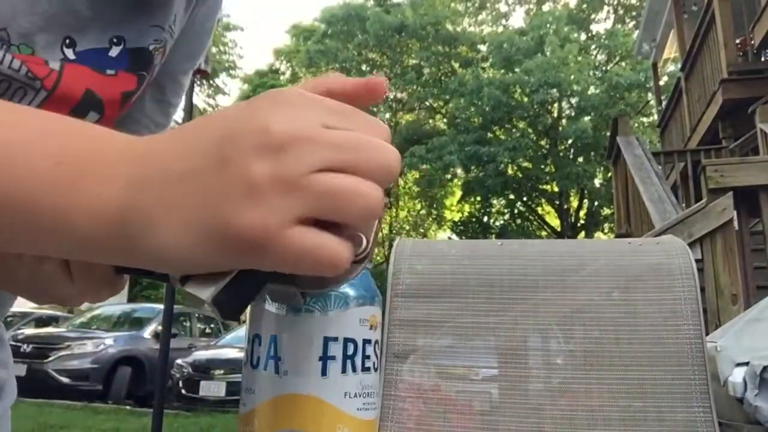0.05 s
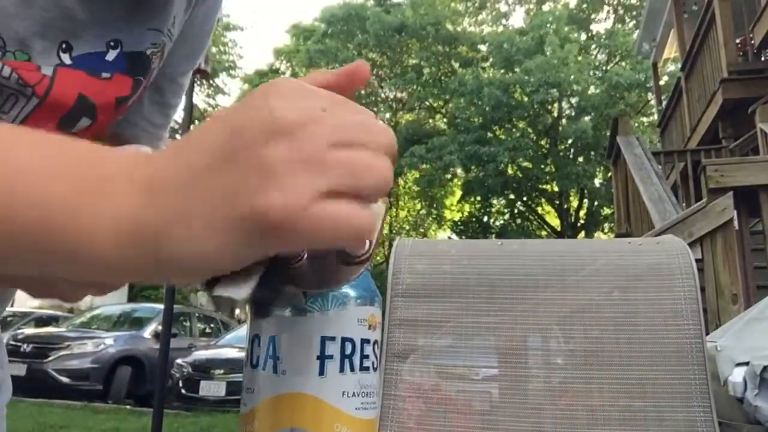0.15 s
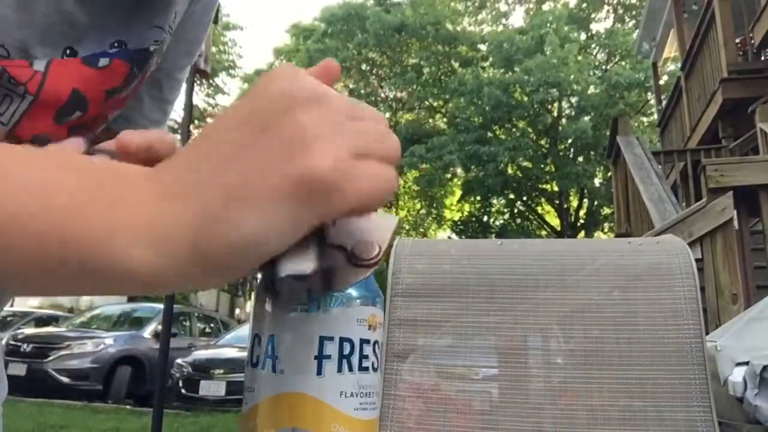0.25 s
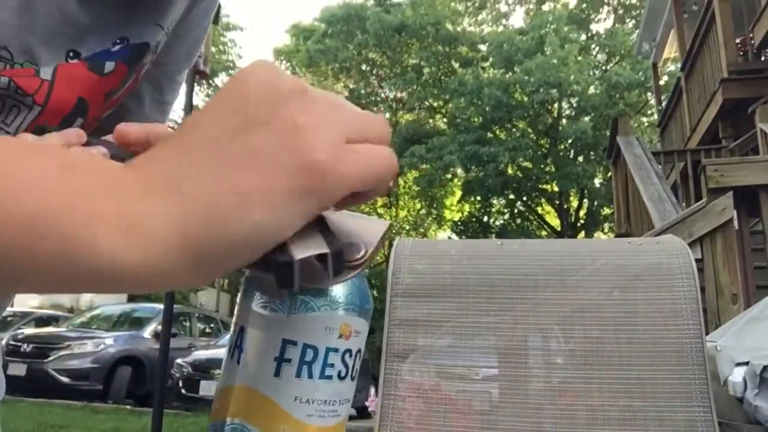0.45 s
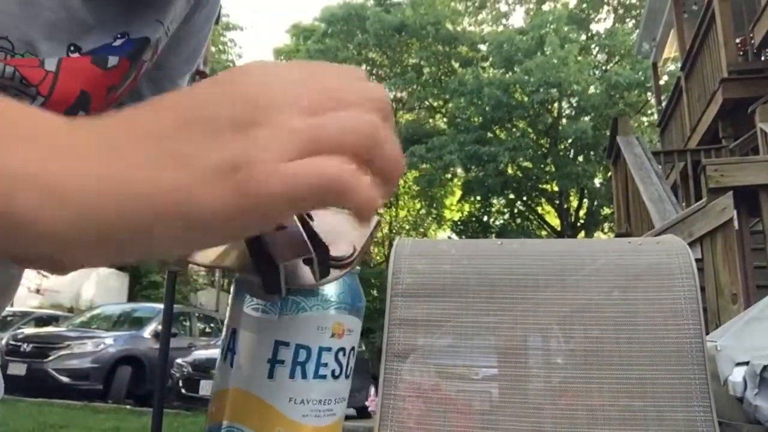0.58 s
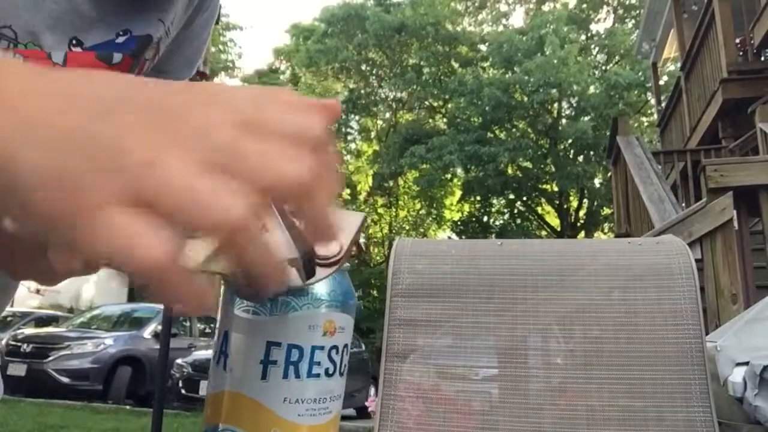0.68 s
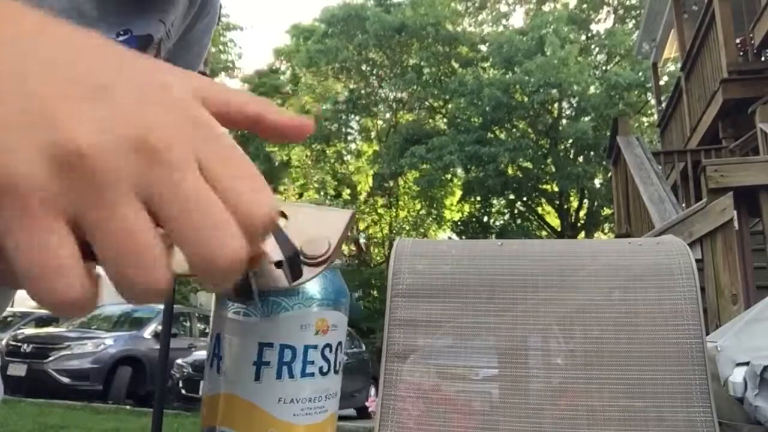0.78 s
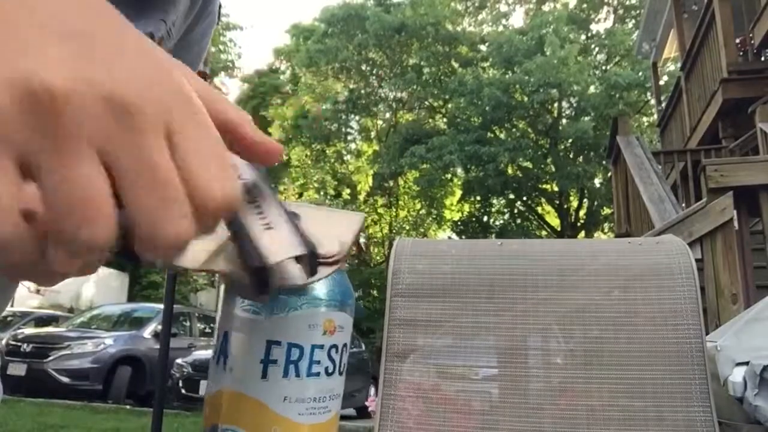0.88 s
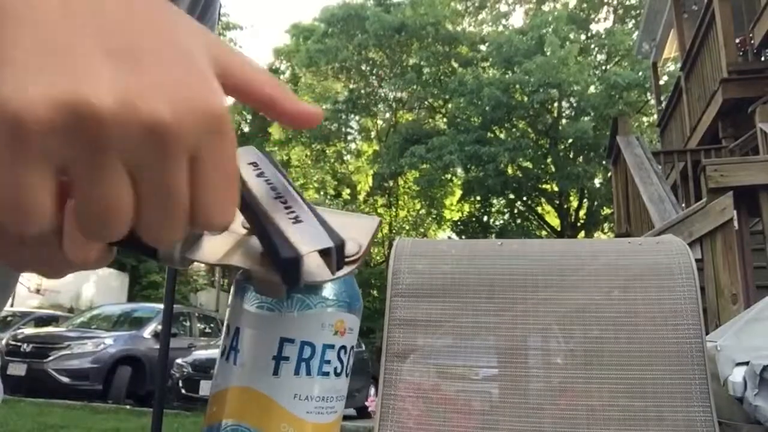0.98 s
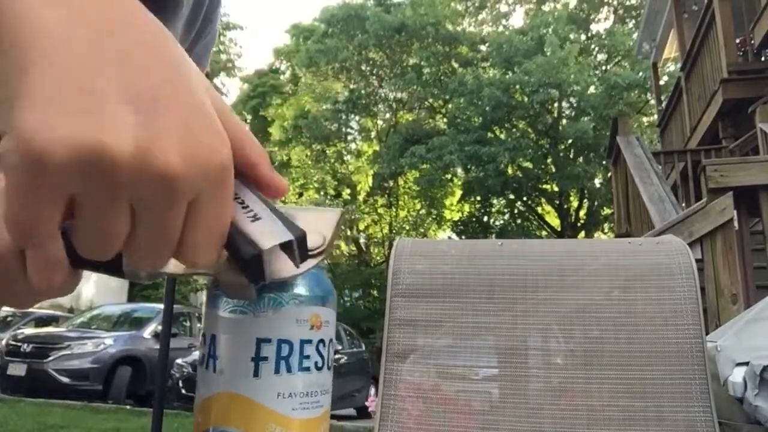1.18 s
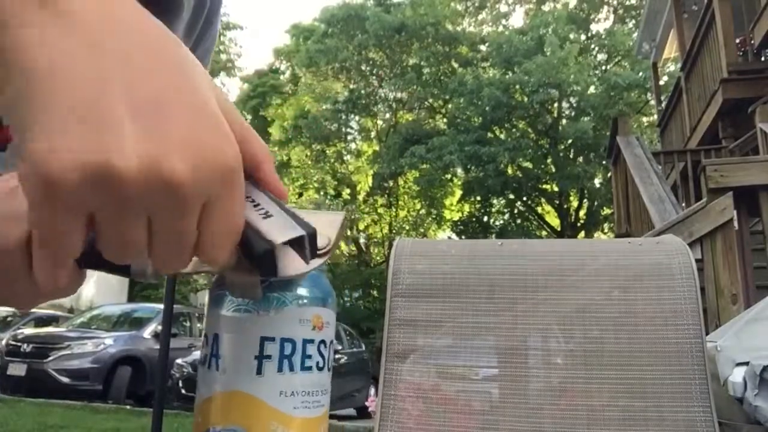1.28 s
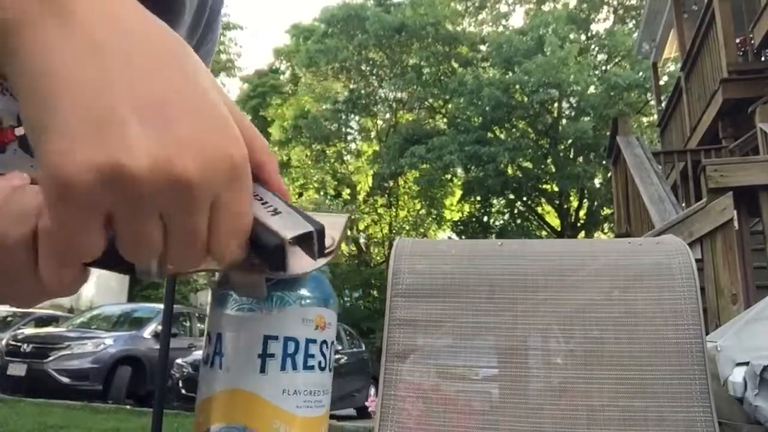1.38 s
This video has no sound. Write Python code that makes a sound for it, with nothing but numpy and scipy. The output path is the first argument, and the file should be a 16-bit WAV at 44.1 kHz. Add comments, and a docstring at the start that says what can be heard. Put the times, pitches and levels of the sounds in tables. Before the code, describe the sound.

A drink can is punctured close by with a sharp metallic pop at about 0.3 seconds, amid low table thumps from 0.2 to 0.4 seconds. Gas escapes in a short hiss, gone by about 0.5 seconds, leaving a faint, fading fizz. The opener ticks lightly near 0.6, 0.9 and 1.4 seconds. Distant traffic and a low, wavering drone fill the quiet yard throughout.

```python
"""Distant traffic and a low drone fill a quiet yard, while an opener rubs faintly on a drink can.
Pressing it into the pressurised can makes the table underneath thump. The lid gives way with
a sharp metallic pop, and the gas escapes in a short hiss. Tiny bubbles then fizz softly
in the drink, and the opener ticks a few more times as it shifts."""
import sys
import numpy as np
from scipy import signal
from scipy.fft import rfft, irfft
from scipy.io import wavfile

SR = 44100
rng = np.random.default_rng(int(sys.argv[2]) if len(sys.argv) > 2 else 0)


def unload_audio(sound):
    """Save the sound as a 16-bit wav file, at the path given as the first command line argument."""
    columns = np.transpose(np.atleast_2d(sound))
    # keep every value between -1 and 1, then stretch to whole-number steps
    steps = np.round(np.clip(columns, -1, 1) * 32767)
    wavfile.write(sys.argv[1], SR, steps.astype(np.int16))


N = 63945
POP_S = 0.3115  # the moment the lid gives way


def amp(db):
    """Turns decibels into a number to multiply by."""
    return 10 ** (np.asarray(db) / 20)


def unit(x):
    """Scales a signal so that its average strength (rms) is 1."""
    return x / np.sqrt(np.mean(x ** 2) + 1e-20)


def since(start):
    """Seconds since start, zero before it."""
    return np.maximum(np.arange(N) / SR - start, 0)


def colour(x, spectrum):
    """Makes some pitches of x stronger than others, then scales it to strength 1."""
    hz, db = np.transpose(spectrum)
    log_hz = np.log(np.fft.rfftfreq(N, 1 / SR) + 1)
    gain = amp(np.interp(log_hz, np.log(hz + 1), db))
    return unit(irfft(rfft(x) * gain, N))


def noise(spectrum):
    """A steady rushing sound with the given mix of low and high pitches."""
    return colour(rng.standard_normal(N), spectrum)


def drift(rate):
    """A smooth random wobble, up to about rate times a second."""
    hz = np.fft.rfftfreq(N, 1 / SR)
    keep_slow = np.exp(-(hz / rate) ** 2) * (hz > 0)
    return unit(irfft(rfft(rng.standard_normal(N)) * keep_slow, N))


def burst(start, rise, hold, fade):
    """A quick swell that begins to die hold seconds after start, losing 60 dB in fade seconds."""
    t = since(start)
    return np.minimum(t / rise, 1) * np.exp(-np.log(1000) * np.maximum(t - hold, 0) / fade)


def ring(start, hz, db, fade, rise):
    """One dying tone of something that has been struck."""
    return amp(db) * burst(start, rise, 0, fade) * np.sin(2 * np.pi * hz * since(start))


# Low and high pitches in the traffic: f/Hz, relative level/dB
TRAFFIC_SPECTRUM = [(25, -43), (36, -35), (48, -21), (66, -6), (82, -13), (100, -12), (145, -14),
                    (175, -11), (228, -14), (262, -13), (300, -18), (382, -20.5), (461, -26.5), (750, -22),
                    (1060, -21), (1640, -26.5), (2300, -34), (3300, -40), (4570, -42), (8000, -51),
                    (15800, -62.5)]
def traffic():
    """Faraway vehicles blur into one steady wash."""
    return amp(-40.5) * noise(TRAFFIC_SPECTRUM)


# How the drone swells and dips: t/s, level/dB
DRONE_SWELLS = [(0, -36), (0.061, -52), (0.139, -35), (.176, -51), (.21, -40.5), (.42, -48), (.53, -44),
                (.57, -40.5), (.82, -34), (.884, -39), (.98, -36.5), (1.1, -41.5), (1.148, -49),
                (1.226, -37), (1.276, -48), (1.345, -33.5), (1.38, -40), (1.45, -36)]
# Pitches in the rumble around the drone: f/Hz, relative level/dB
RUMBLE_SPECTRUM = [(50, -22), (95, -2), (135, -1.5), (200, -9), (300, -18), (600, -55)]
def drone():
    """A low, wavering tone and a softer rumble swell and flutter together."""
    pitch_hz = 64.87 + 3.26 * drift(rate=14)
    cycles = np.cumsum(pitch_hz) / SR
    tone = unit(np.sin(2 * np.pi * cycles))
    swell = amp(np.interp(since(0), *np.transpose(DRONE_SWELLS)))
    flutter = 1 + 0.16 * drift(rate=45)
    rumble = amp(-9.5) * noise(RUMBLE_SPECTRUM)
    return swell * flutter * (tone + rumble)


# Ticks and scrapes of the opener: t/s, level/dB, fade time/s
OPENER_TICKS = [(.1014, -70, .04), (.1894, -69, .03), (0.6193, -50.5, 0.11), (0.858, -41, .02),
                (1.3844, -59, .03)]
# Pitches in the sound of the blade on the lid: f/Hz, relative level/dB
SCRAPE_SPECTRUM = [(500, -28), (2500, -12), (3850, -0.5), (5200, -4.5), (6800, -7), (10000, -15),
                   (16000, -21)]
def opener():
    """The blade rubs on the lid until it breaks through, and the tool ticks as it shifts."""
    rub = amp(-58) * (since(POP_S) == 0)
    ticks = sum(amp(db) * burst(start, rise=0.0011, hold=0, fade=fade) for start, db, fade in OPENER_TICKS)
    return (rub + ticks) * noise(SCRAPE_SPECTRUM)


# Jolts that the can passes to the table: t/s, level/dB, centre f/Hz
JOLTS = [(.197, -10.5, 260), (0.251, -15, 290), (0.3019, 0.5, 346), (.313, -3.5, 180), (0.371, -11.5, 136),
         (0.4209, -21.5, 260)]
# Tones of the table with the can on it: f/Hz, relative level/dB, fade time/s
TABLE_TONES = [(108.5, -17.5, 0.39), (141, -19, 0.065), (177.5, -10.5, 0.18), (222, -16, 0.38),
               (267, -28, 0.48), (308.6, -20.5, 0.38), (345, -37, 0.52)]
def table():
    """Each jolt sets the table booming, most of all in the tones near the jolt's own pitch."""
    width_octaves = 0.79  # the range of pitches that a jolt shakes strongly
    thumps = np.zeros(N)
    for start, jolt_db, centre_hz in JOLTS:
        for hz, tone_db, fade in TABLE_TONES:
            pitch_gap = np.log2(hz / centre_hz) / (width_octaves / 2)
            thumps += ring(start, hz, jolt_db + tone_db, fade, rise=0.015) / np.sqrt(1 + pitch_gap ** 2)
    return thumps


# Ringing tones of the lid and blade: f/Hz, level/dB, fade time/s
LID_TONES = [(716, -23, 0.04), (907, -29.5, 0.082), (1110, -32, 0.03), (1398, -27, 0.067),
             (1617, -23, 0.051), (1710, -31, 0.042), (2027, -33, 0.1), (2286, -16.5, 0.031),
             (2442, -19, 0.068), (2517, -31, 0.074), (3285, -14, 0.029), (3640, -23.5, 0.025),
             (4390, -10.5, 0.02), (4904, -10, 0.019), (5180, -28, .014), (5690, -14, 0.025),
             (8100, -13.5, 0.017), (8410, -10, 0.015), (9760, -14.5, 0.0091), (10760, -14, 0.01),
             (15250, -17, .014)]
# Pitches in the tearing metal: f/Hz, relative level/dB
TEAR_SPECTRUM = [(200, -14), (520, -23), (700, -3.5), (1500, -2), (1900, -12), (2300, 3), (2850, -13),
                 (3500, -4.5), (3900, -9), (5000, -0.5), (6900, -8.5), (8300, -27), (9400, -14),
                 (13500, -14), (16000, -10.5)]
def pop():
    """The lid snaps, rings briefly and tears around the blade."""
    ringing = np.zeros(N)
    for hz, db, fade in LID_TONES:
        delay_s = 0.00064 / np.sqrt(hz / 1000)  # higher tones ripple across the lid sooner
        ringing += ring(POP_S + delay_s, hz, db, fade, rise=0.00032)
    tear = amp(-17) * burst(POP_S, rise=0.00071, hold=0.0018, fade=0.037) * noise(TEAR_SPECTRUM)
    return ringing + tear


# Pitches in the hiss of escaping gas: f/Hz, relative level/dB
HISS_SPECTRUM = [(300, -27), (500, -15), (700, -5.5), (1100, -8), (1500, -4.5), (2000, 1), (2450, -4),
                 (3300, -4), (4600, -8.5), (5950, -3.5), (6700, -14), (8200, -6), (9800, -15),
                 (11300, -11.5), (15500, -12)]
def gas():
    """The sputtering jet of gas weakens as the pressure falls, then dies away."""
    jet_db = -31 - 92 * since(POP_S)
    sputter_db = drift(rate=210)
    puff = burst(POP_S, rise=0.0062, hold=0.037, fade=0.28)
    return amp(jet_db + sputter_db) * puff * noise(HISS_SPECTRUM)


# Pitches in the fizzing drink: f/Hz, relative level/dB
FIZZ_SPECTRUM = [(1000, -23), (4500, 2.5), (8000, -3), (15000, -17)]
def fizz():
    """Tiny bubbles burst in the opened can, ever more faintly."""
    bubbles_per_s = 2500
    bubbles = rng.standard_normal(N) * (rng.random(N) < bubbles_per_s / SR)
    return amp(-58) * burst(POP_S, rise=0.02, hold=0, fade=4.1) * colour(bubbles, FIZZ_SPECTRUM)


def scene():
    """Adds all the sounds together in one channel."""
    return (traffic() + drone() + opener() + table() + pop() + gas() + fizz())[None]


def record(dry):
    """Takes away the very highest pitches, above 16100 Hz."""
    low_pass = signal.firwin(401, 16100, window=("kaiser", 9), fs=SR)
    return signal.oaconvolve(dry, low_pass[None], "same")


dry = scene()
out = record(dry)
unload_audio(out)
```